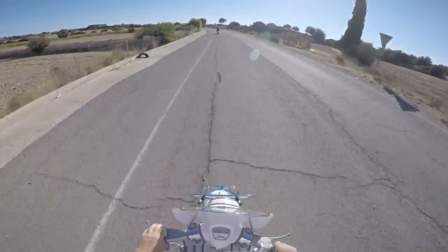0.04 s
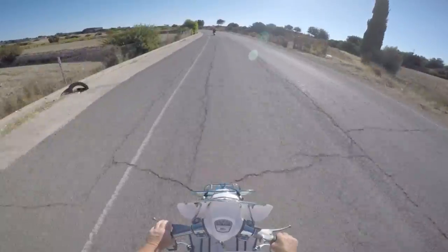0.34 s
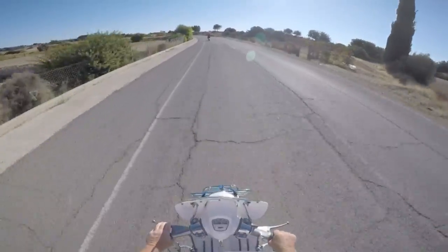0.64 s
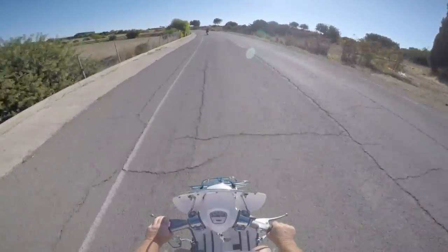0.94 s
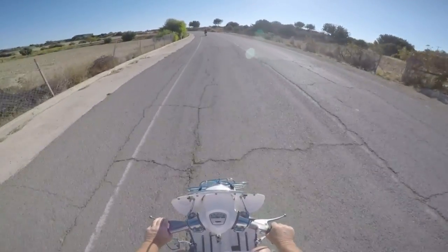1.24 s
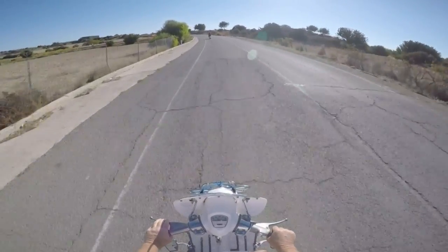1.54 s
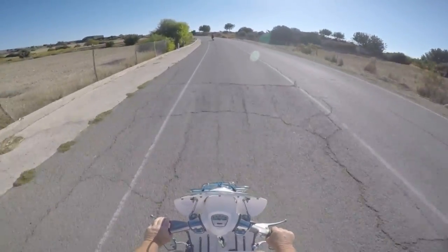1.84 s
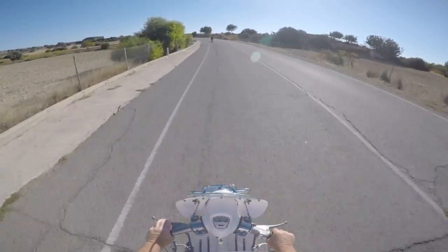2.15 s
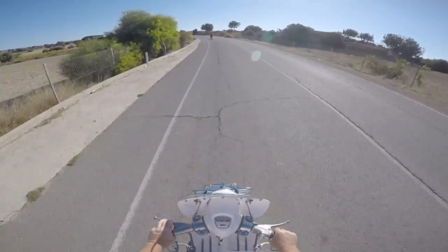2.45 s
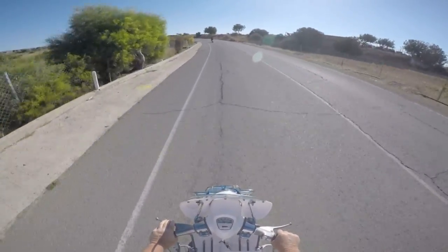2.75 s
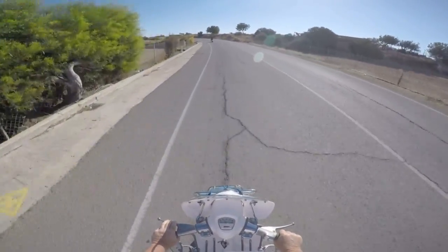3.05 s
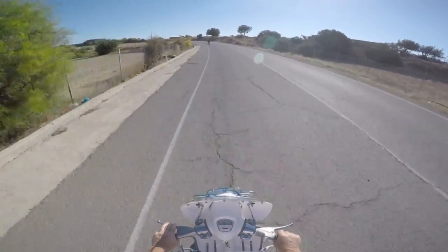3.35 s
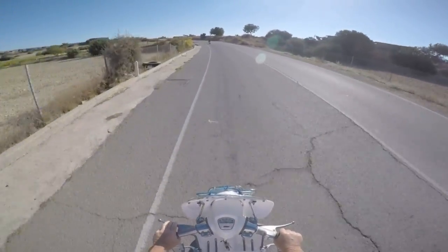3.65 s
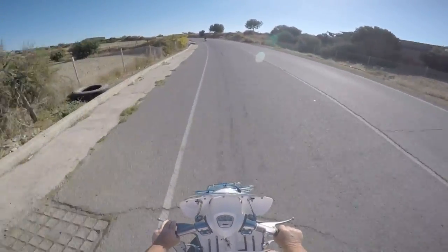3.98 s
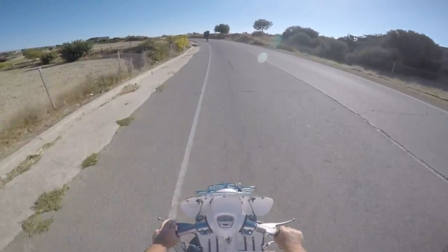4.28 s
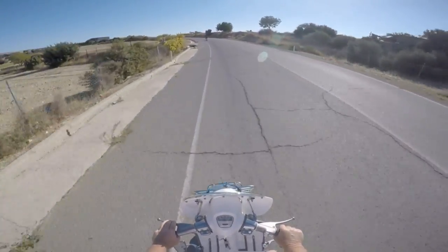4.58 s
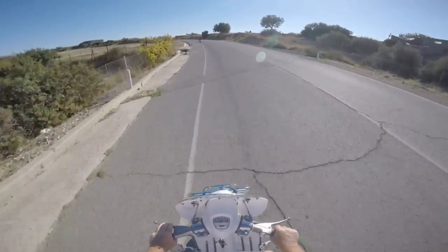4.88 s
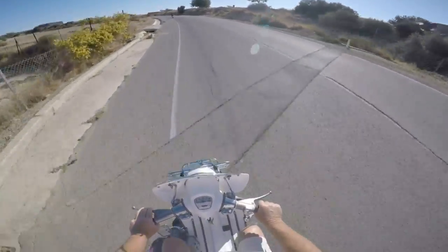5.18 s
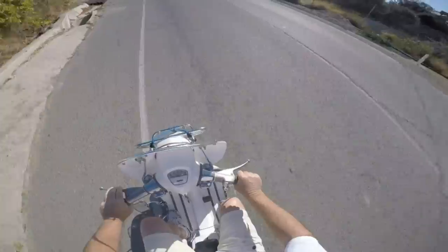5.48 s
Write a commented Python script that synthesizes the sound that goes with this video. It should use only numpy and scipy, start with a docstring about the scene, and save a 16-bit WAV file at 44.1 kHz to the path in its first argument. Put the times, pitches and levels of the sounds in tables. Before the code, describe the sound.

A small four-stroke scooter is already cruising on a country road, heard up close from a camera worn by the rider. Its exhaust drones for the whole five and a half seconds, rising slowly and only slightly in pitch, with a fine metallic valve rattle on top. A constant low wind rumble buffets the microphone, and a softer hiss of air and tyres gently swells and eases. A body panel buzzes lightly during the first second. A faint gear whine comes in by about 0.9 seconds and then slowly fades. Gusts give short low thumps at around 0.6, 1.3 and 2.1 seconds, with the strongest pair at 3.8 and 4 seconds. A thin, trembling wind whistle grows as the speed builds. Panels buzz briefly again near 4.9 and 5.5 seconds, and the engine is still pulling at the end.

```python
"""Scooter on a country road

A small four-stroke gathers speed, heard from a camera worn by the rider. The exhaust drones on the
orders of the firing rate, the valve gear ticks into the casing, panels buzz and the gears whine.
The head wind buffets the microphone, hisses past it and raises a thin whistle."""
import sys
import numpy as np
from scipy import signal
from scipy.fft import rfft, irfft, next_fast_len
from scipy.io import wavfile
from scipy.ndimage import uniform_filter1d, minimum_filter1d

SR = 44100
rng = np.random.default_rng(int(sys.argv[2]) if len(sys.argv) > 2 else 0)


def wav_out(sig):
    """Save sig, one row per channel (or a flat mono array), as 16-bit PCM at SR to the path in sys.argv[1]."""
    wavfile.write(sys.argv[1], SR, np.round(np.clip(np.atleast_2d(sig).T, -1, 1) * 32767).astype(np.int16))


N = 247837

# engine speed, a steady pull: time_s, firing_hz
FIRING_RATE = [(0, 77.85), (.8, 78.49), (2.5, 80.28), (3.8, 83.09), (4.4, 83.68), (5.62, 86.2)]
# silencer and intake resonances, with an order's rms at their centre: centre_hz, width_hz, level_db
SILENCER_MODES = [(81, 57, -24.5), (157.9, 14.33, -22.5), (173.5, 8.3, -26), (232.5, 18.5, -23.5),
                  (246.7, 13, -23), (310, 63, -32.5), (425.5, 51, -24.5), (471.7, 76, -19.5),
                  (514.5, 28, -21.5), (575, 120, -32.5), (621, 94, -36), (725, 68, -45.5), (869, 36, -41.5),
                  (949, 44, -43), (1027, 33, -44)]
# valve knocks within one cycle: position_cycles, relative_db
VALVE_KNOCKS = [(0.131, -8.5), (.35, -1.5), (.64, -2.5), (0.859, -1)]
# metallic ring of the engine casing: centre_hz, width_hz, relative_db
CASING_MODES = [(1082, 160, -7), (1887, 170, -13), (2597, 108, 0), (2836, 260, -2), (3170, 200, -7),
                (3424, 260, -3.5), (4010, 270, -8)]
# body panels that buzz for a moment: peak_s, half_length_s, pitch_hz, width_hz, level_db
PANEL_BUZZES = [(0, 0.73, 1114, 35, -33.5), (4.9, 0.2, 930, 40, -38.5), (5.53, 0.27, 2789, 400, -43)]
# the air rush swells and eases with the head wind: time_s, gain_db
HEAD_WIND = [(0, 0), (.55, 1.5), (1.5, -1.8), (2, 0), (2.85, -.5), (3.4, 1.1), (4.1, -0.9), (4.5, 0.5),
             (5.62, -2)]
# base spectrum of the wind rumble on the microphone: frequency_hz, density_db
BUFFET_SPECTRUM = [(8, -78.5), (20, -39.5), (32, -33.5), (50, -34), (80, -35.5), (120, -39.5), (170, -44),
                   (260, -45), (410, -45), (500, -49.5), (620, -56.5), (800, -64.5), (1400, -72),
                   (3000, -91.5)]
# the strongest gusts: peak_s, bass_boost_db
GUST_THUMPS = [(.64, 6), (1.27, 4), (2.13, 5), (3.79, 7), (4, 9)]
# base spectrum of the rush of air, tyres and belt: frequency_hz, density_db
RUSH_SPECTRUM = [(300, -73), (1000, -63.5), (1500, -73.5), (2200, -72), (3200, -70.5), (3800, -78),
                 (5500, -80), (7200, -87.5), (8400, -92.5), (9600, -93.5), (11500, -98.5), (15000, -102)]
# hollows in the camera housing that colour the rush: centre_hz, width_hz, gain_db
HOUSING_MODES = [(4010, 160, -4), (4680, 150, -10), (5160, 93, -9.5), (6830, 170, -3)]


def undb(db):
    """Decibels to gain."""
    return 10 ** (np.asarray(db) / 20)


def curve(table):
    """An automation lane: (time_s, value) points joined up at every sample."""
    return np.interp(np.arange(N) / SR, *np.transpose(table))


def unit(x):
    """Scale to rms 1."""
    return x / np.sqrt(np.mean(x ** 2))


def drift(rate_hz):
    """A smooth random modulator of rms 1 that moves about rate_hz times a second."""
    f = np.fft.rfftfreq(N, 1 / SR)
    return unit(irfft(rfft(rng.standard_normal(N)) * np.exp(-(f / rate_hz) ** 2) * (f > 0), N))


def shelf(x, hz, side, db):
    """A low or high shelf EQ whose gain may move."""
    band = signal.sosfiltfilt(signal.butter(2, hz, side, fs=SR, output="sos"), x)
    return x + band * (undb(db) - 1)


def noise(spectrum):
    """Noise shaped to (frequency_hz, density_db) points."""
    hz, db = np.transpose(spectrum)
    size = next_fast_len(N)
    f = np.fft.rfftfreq(size, 1 / SR)
    gain = undb(np.interp(np.log(f + 1e-9), np.log(hz), db)) * (f > 0)
    return irfft(rfft(rng.standard_normal(size)) * gain, size)[:N] * np.sqrt(SR / 2)


def ring(x, modes, order=1):
    """A resonator bank of (centre_hz, width_hz, gain_db); a higher order steepens the skirts."""
    out = 0
    for hz, width, db in modes:
        section = np.concatenate(signal.iirpeak(hz, hz / width, fs=SR))
        out += undb(db) * signal.sosfilt(np.tile(section, (order, 1)), x)
    return out


def exhaust_drone(firing_hz, cycles, orders=12, waver_db=.5, waver_db_per_order=.1355, roughness=.046):
    """Firing orders swell as they slide through the silencer's resonances; uneven firings add grain."""
    drone = 0
    for order in range(1, orders + 1):
        responses = [undb(db) / (1 + (2 * (order * firing_hz - centre) / width) ** 2)
                     for centre, width, db in SILENCER_MODES]
        waver = undb((waver_db + waver_db_per_order * order) * drift(3.8))
        tone = np.sqrt(2) * np.sin(2 * np.pi * (order * cycles + rng.random()))
        drone += np.max(responses, axis=0) * waver * tone
    return drone * (1 + roughness * drift(40))


def valve_knocks(cycles, scatter_db=2, scrape_mix=.94, decay_cycles=.092, slack_cycles=.0054):
    """The valve gear's force on the casing: each knock is a sharp tap with a short, gritty scrape."""
    each_cycle = np.arange(int(cycles[-1]) + 1)
    taps, scrape_envelope = np.zeros(N + 1), np.zeros(N)
    for position, db in VALVE_KNOCKS:
        level_jitter, time_jitter = rng.standard_normal((len(each_cycle), 2)).T
        strength = undb(db + scatter_db * level_jitter)
        at = np.interp(each_cycle + position + slack_cycles * time_jitter, cycles, np.arange(N))
        sample, inside = at.astype(int), at < N - 1
        np.add.at(taps, sample, inside * strength * (1 - at % 1))  # a tap straddles two samples
        np.add.at(taps, sample + 1, inside * strength * (at % 1))
        since = cycles - position
        latest = np.clip(since.astype(int), 0, len(strength) - 1)
        scrape_envelope += strength[latest] * np.exp(-(since % 1) / decay_cycles)
    return unit(taps[:N]) + scrape_mix * unit(scrape_envelope * rng.standard_normal(N))


def body_rattle(knocks, firing_hz, casing_db=-43, rise_db=2, damping_hz=3800):
    """The knocks ring the casing, harder as the revs climb, and set loose panels buzzing."""
    t = np.arange(N) / SR
    revs = (firing_hz - firing_hz.mean()) / np.ptp(firing_hz)
    plastic_covers = signal.butter(4, damping_hz, fs=SR, output="sos")
    muffled = signal.sosfilt(plastic_covers, knocks)
    rattle = unit(ring(muffled, CASING_MODES, order=2)) * undb(casing_db + rise_db * revs)
    for peak_s, half_length_s, hz, width, db in PANEL_BUZZES:
        buzz = unit(ring(muffled, [(hz, width, 0)], order=2))
        rattle += buzz * undb(db) * np.exp(-((t - peak_s) / half_length_s) ** 2)
    return rattle


def wind_whistle(firing_hz, pitch_hz=2606, wobble_hz=28, level_db=-45.5, db_per_firing_hz=.6):
    """A thin, trembling whistle, probably air over an edge; it grows louder with speed."""
    phase = 2 * np.pi * np.cumsum(pitch_hz + wobble_hz * drift(40)) / SR
    gain = undb(level_db + db_per_firing_hz * (firing_hz - firing_hz.mean()))
    return gain * np.sqrt(2) * np.sin(phase)


def wind_buffet(eddies, trim_db=.25, eddy_db=1.1, gust_db=.6, thump_half_s=.023, ceiling=.82):
    """Eddies thump on the microphone; gusts pump the bass and the biggest pushes soft-clip."""
    t = np.arange(N) / SR
    rumble = noise(BUFFET_SPECTRUM) * undb(trim_db + eddy_db * eddies)
    thumps_db = sum(db * np.exp(-((t - peak_s) / thump_half_s) ** 2) for peak_s, db in GUST_THUMPS)
    gusting = shelf(rumble, hz=150, side="low", db=gust_db * drift(8) + thumps_db)
    rounded = ceiling * np.tanh(gusting / ceiling)
    return signal.sosfilt(signal.butter(2, 2000, fs=SR, output="sos"), rounded)


def air_rush(eddies, flutter_db=.4, brighten=.7):
    """A bed of air, tyre and belt hiss, coloured by the housing; faster air sounds brighter."""
    flow_db = curve(HEAD_WIND)
    rush = noise(RUSH_SPECTRUM) * undb(flow_db + flutter_db * eddies)
    rush = shelf(rush, hz=8500, side="high", db=brighten * flow_db)
    return rush + ring(rush, HOUSING_MODES)


def gear_whine(cycles, order=24, peak_s=.9, peak_db=-47, rise_db_per_s=36, fade_db_per_s=1.3):
    """Meshing teeth sing a thin tone locked to the engine: quick in under load, then a slow fade."""
    since_s = np.arange(N) / SR - peak_s
    level_db = peak_db + np.minimum(rise_db_per_s * since_s, -fade_db_per_s * since_s)
    waver_db = 2 * drift(5)
    return undb(level_db + waver_db) * np.sqrt(2) * np.sin(2 * np.pi * order * cycles)


def scene(hunt_depth=.00093):
    """The mono mix: the engine hunts slightly about its rising speed, under the wind."""
    firing_hz = curve(FIRING_RATE)
    cycles = np.cumsum(firing_hz * (1 + hunt_depth * drift(11.2))) / SR
    engine = exhaust_drone(firing_hz, cycles) + body_rattle(valve_knocks(cycles), firing_hz)
    eddies = drift(30)  # the same turbulence shakes rumble and hiss
    wind = wind_whistle(firing_hz) + wind_buffet(eddies) + air_rush(eddies)
    return (engine + wind + gear_whine(cycles))[None]


def record(dry, ceiling=.86, top_hz=15000):
    """The camera's limiter eases down the biggest thumps; a steep low-pass cuts the top."""
    window = SR // 100  # 10 ms
    allowed_gain = np.minimum(1, ceiling / (np.abs(dry) + 1e-9))
    held_gain = minimum_filter1d(allowed_gain, 2 * window)
    gain = uniform_filter1d(uniform_filter1d(held_gain, window), window)
    return signal.sosfilt(signal.ellip(10, .1, 80, top_hz, fs=SR, output="sos"), dry * gain)


dry = scene()
out = record(dry)
wav_out(out)
```